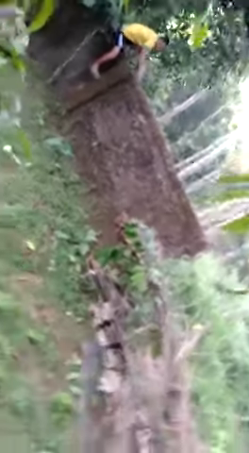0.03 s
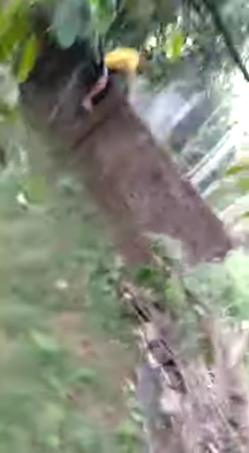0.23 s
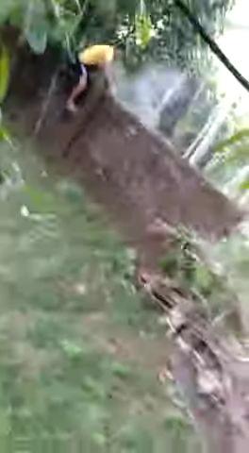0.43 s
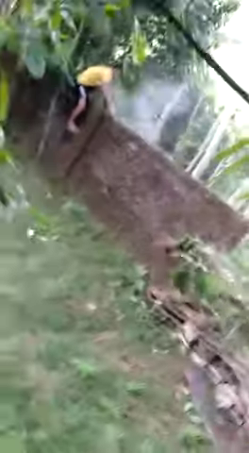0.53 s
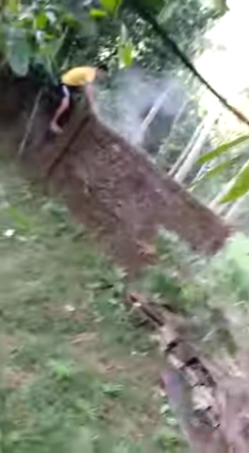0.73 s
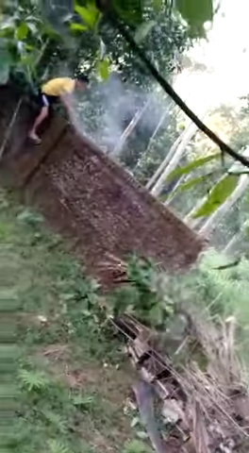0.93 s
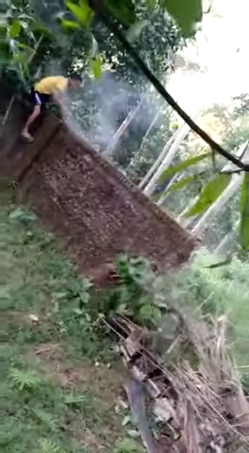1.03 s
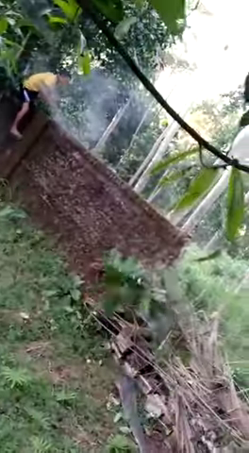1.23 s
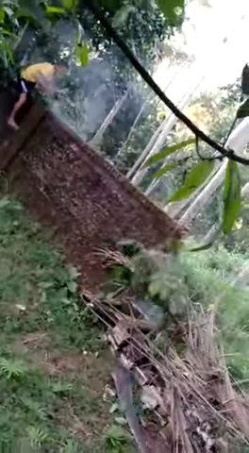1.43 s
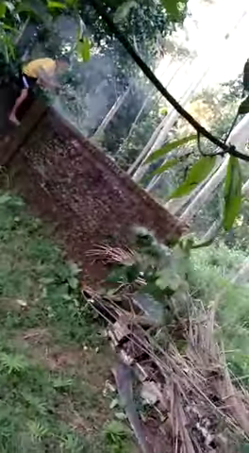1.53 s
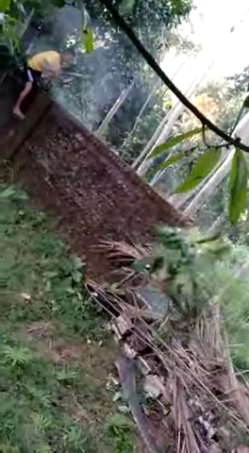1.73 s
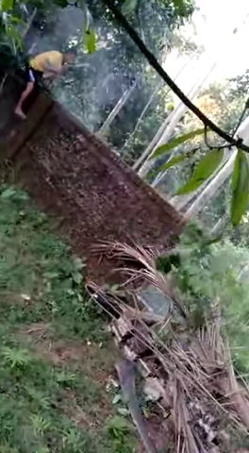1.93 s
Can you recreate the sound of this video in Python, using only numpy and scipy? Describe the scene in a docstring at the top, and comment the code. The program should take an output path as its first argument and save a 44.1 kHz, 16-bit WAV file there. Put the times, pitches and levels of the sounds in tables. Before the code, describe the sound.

A loud, sharp bang goes off on a wooded hillside, just after two soft bumps. Its echo crackles through the trees and rolls away, then leaves rustle faintly near the microphone over quiet insects.

```python
"""On a wooded hillside, a powder charge goes off: two soft bumps, a short spit of ignition, the bang.
Nearby trees scatter the bang, the slope throws it back and the valley rolls on.
Insects sing faintly over a light breeze. Afterwards leaves rustle close to the microphone,
a twig ticks and a faint, far tone slides down."""
import sys
import numpy as np
from scipy import signal
from scipy.fft import rfft, irfft, next_fast_len
from scipy.io import wavfile
from scipy.ndimage import map_coordinates

SR = 44100
rng = np.random.default_rng(int(sys.argv[2]) if len(sys.argv) > 2 else 0)


def wav_out(sig):
    """Save sig, one row per channel (or a flat mono array), as 16-bit PCM at SR to the path in sys.argv[1]."""
    wavfile.write(sys.argv[1], SR, np.round(np.clip(np.atleast_2d(sig).T, -1, 1) * 32767).astype(np.int16))


N = 88200
BANG_S, TOP_HZ = 0.2032, 15780


def amp(db):
    """Turn decibels (dB) into a multiplier."""
    return 10 ** (np.asarray(db) / 20)


def unit(x):
    """Scale a sound to an average (rms) level of 1."""
    return x / np.sqrt(np.mean(x ** 2) + 1e-20)


def along(points, hz):
    """Read between a table's rows, on a log frequency scale."""
    freqs, values = np.transpose(points)
    return np.interp(np.log(hz + 1), np.log(freqs + 1), values)


def since(start):
    """Seconds since the start, zero before it."""
    return np.maximum(np.arange(N) / SR - start, 0)


def wobble(rate):
    """A smooth curve through `rate` random values a second."""
    values = rng.standard_normal(int(N * rate / SR) + 4)
    return map_coordinates(values, [np.arange(N) * rate / SR])


def filtered(x, response):
    """Turn each frequency up or down by response(hz)."""
    size = next_fast_len(N + SR // 2)
    return irfft(rfft(x, size) * response(np.fft.rfftfreq(size, 1 / SR)), size)[:N]


def noise(colour, grain_db=0):
    """Noise with a colour (its balance of low and high); grain_db makes it gritty."""
    white = rng.standard_normal(N) * amp(grain_db * wobble(1500))
    return unit(filtered(white, lambda hz: amp(along(colour, hz))))


def burst(start, rise, fade):
    """A quick swell that dies away. A fade time is the seconds it takes to drop 60 dB."""
    t = since(start)
    return (1 - np.exp(-t / rise)) * amp(-60 * t / fade)


def pulse(colour, size=4096):
    """One push of air with the given colour and a peak of 1."""
    level_db = np.maximum(along(colour, np.fft.rfftfreq(size, 1 / SR)), -60)
    cepstrum = irfft(np.log(amp(level_db)))
    # pack the energy at the start of the pulse
    cepstrum[1:size // 2] *= 2
    cepstrum[size // 2 + 1:] = 0
    push = irfft(np.exp(rfft(cepstrum)))
    return push / np.abs(push).max()


def strikes(rows, shape):
    """Play one short sound at each row's start and level."""
    hits = np.zeros(N)
    for start, db in rows:
        hits[round(start * SR)] += amp(db)
    return signal.fftconvolve(hits, shape)[:N]


def scatter(colour, fades, delay, rise, hold, grain_db=0):
    """Countless small echoes of the bang build up, hold, then each frequency fades at its own speed."""
    hz, t, bands = signal.stft(noise(colour, grain_db), SR, nperseg=256)
    age = np.maximum(t - BANG_S - delay - hold, 0)
    tail = signal.istft(bands * amp(-60 * age / along(fades, hz)[:, None]), SR)[1][:N]
    return tail * (1 - np.exp(-since(BANG_S + delay) / rise))


# The hush of still air. Each row: frequency in Hz, relative level in dB.
AIR_COLOUR = [(25, -2.5), (70, -5), (160, -1.5), (260, -12), (450, -14), (800, -14.5), (1500, -14.5),
              (2200, -20), (3900, -24), (8000, -25), (12000, -30), (15800, -26)]
# The low breeze. Each row: frequency in Hz, relative level in dB.
BREEZE_COLOUR = [(12, -29), (20, 7.5), (27, 0), (60, -19), (150, -4.5), (300, -23), (400, -8.5), (520, -22),
                 (880, -120)]
def air():
    """A breeze slowly rises over still air."""
    swell = 1 - np.exp(-since(0) / 0.76)
    breeze = amp(-63.5 + 0.59 * wobble(6.5)) * noise(BREEZE_COLOUR) * swell
    return breeze + amp(-62) * noise(AIR_COLOUR)


# Insect voices. Each row: pitch in Hz, width in Hz, starting level in dB.
INSECT_BANDS = [(4680, 340, -70), (6210, 190, -71.5), (6830, 190, -63.5), (9520, 590, -73.5)]
def insects(fade_db_per_s=4.5):
    """Insects sing in narrow, pulsing bands of noise that slowly fade."""
    song = np.zeros(N)
    for pitch, width, db in INSECT_BANDS:
        level = amp(db + 1.8 * wobble(45.3))
        band = filtered(rng.standard_normal(N), lambda hz: np.exp(-.5 * ((hz - pitch) / width) ** 2))
        song += level * unit(band)
    return song * amp(-fade_db_per_s * since(0))


def far_tone(start=1.81, length_s=0.13, hz=662, fall_hz_per_s=1040):
    """A faint, far tone swells, slides down and fades."""
    t = np.minimum(since(start), length_s)
    phase = 2 * np.pi * (hz * t - .5 * fall_hz_per_s * t ** 2)
    return amp(-60.5) * np.sin(np.pi * t / length_s) * np.sin(phase)


# Rustling leaves. Each row: frequency in Hz, relative level in dB.
RUSTLE_COLOUR = [(530, -32), (900, -2.5), (1390, -6.5), (1680, -7), (1830, -1.5), (3210, 0), (4760, -8),
                 (5310, -9.5), (6660, -3.5), (7980, -14), (10400, -22), (15800, -8)]
# How the rustle comes and goes. Each row: time in seconds, level in dB.
RUSTLE_SWELL = [(.4, -100), (0.751, -63.5), (.95, -57.5), (1.12, -61), (1.28, -55), (1.42, -54.5),
                (1.52, -57), (1.619, -54.5), (1.77, -54.5), (1.88, -59.5), (2, -57.5)]
# The fine hiss of sliding leaves. Each row: frequency in Hz, relative level in dB.
SWISH_COLOUR = [(2940, -38), (5000, -8), (5150, -13), (6800, 0), (8910, -17), (11600, -14.5), (15800, -3)]
# Leaves brushing past. Each row: start in seconds, level in dB, fade time in seconds.
LEAF_BRUSHES = [(1.27, -58, .25), (1.542, -47, 0.038), (1.573, -45, 0.16), (1.628, -55, 0.054),
                (1.727, -55, .08), (1.925, -54.5, 0.2)]
# The sound of a brush. Each row: frequency in Hz, relative level in dB.
BRUSH_COLOUR = [(350, -46), (600, -24), (778, -5), (1240, -7), (2560, 2), (4910, -18), (6730, -9),
                (8000, -21), (10400, -55), (17600, -120)]
def leaves():
    """Leaves close by rustle, slide and brush past."""
    level_db = np.interp(since(0), *np.transpose(RUSTLE_SWELL)) + 0.65 * wobble(29.9)
    rustle = amp(level_db) * noise(RUSTLE_COLOUR, grain_db=2)
    swish = amp(-52) * noise(SWISH_COLOUR, grain_db=2) * burst(1.13, rise=0.035, fade=1.85)
    brushing = sum(amp(db) * burst(start, 0.0052, fade) for start, db, fade in LEAF_BRUSHES)
    return rustle + swish + noise(BRUSH_COLOUR, grain_db=5) * brushing


# Twig ticks. Each row: start in seconds, level in dB.
TWIG_TICKS = [(1.9122, -44), (1.928, -52), (1.938, -50), (1.966, -55)]
# The twig's ring. Each row: pitch in Hz, relative level in dB, fade time in seconds.
TWIG_NOTES = [(2930, 2.5, 0.042), (2330, -5.5, 0.058), (1850, -17, 0.018), (6750, -15, 0.014)]
# Light taps on wood. Each row: start in seconds, level in dB, pitch in Hz.
WOOD_TAPS = [(.0472, -47.5, 714), (.0757, -49, 617), (1.579, -45, 944), (1.731, -51, 1000)]
def twigs():
    """Small bits of wood tick and tap with a short, slightly rough ring."""
    def ring(hz, fade):
        return np.sin(2 * np.pi * hz * since(0) + .5 * wobble(250)) * burst(0, 0.0013, fade)
    tick = sum(amp(db) * ring(hz, fade) for hz, db, fade in TWIG_NOTES)
    taps = sum(strikes([(start, db)], ring(hz, fade=0.031)) for start, db, hz in WOOD_TAPS)
    return strikes(TWIG_TICKS, tick) + taps


# The hills' deep rumble. Each row: frequency in Hz, relative level in dB.
RUMBLE_COLOUR = [(20, 6), (45, -14), (90, -13), (160, -17), (300, -43)]
# How it dies away. Each row: frequency in Hz, fade time in seconds.
RUMBLE_FADES = [(30, 1.8), (150, 1.4)]
# Booms from the hills. Each row: start in seconds, level in dB.
HILL_BOOMS = [(.312, -38), (0.363, -47), (.745, -50)]
def hills():
    """The hills return the low part of the blast as a rumble and a few booms."""
    rumble = amp(-46.5) * scatter(RUMBLE_COLOUR, RUMBLE_FADES, delay=0.12, rise=0.016, hold=0.18)
    booming = sum(amp(db) * burst(start, rise=0.0034, fade=0.16) for start, db in HILL_BOOMS)
    return rumble + noise(RUMBLE_COLOUR) * booming


# The valley's roll. Each row: frequency in Hz, relative level in dB.
VALLEY_COLOUR = [(59, -54), (100, -38), (267, -6), (497, -8), (786, 2), (942, -9.5), (1110, -6), (1510, -7),
                 (1700, -10), (1970, -5.5), (2170, -12), (3060, -13.5), (5000, -26), (6500, -45),
                 (11000, -120)]
# How it dies away. Each row: frequency in Hz, fade time in seconds.
VALLEY_FADES = [(150, 4.1), (750, 4.15), (1500, 2.7), (4000, 1.33)]
def valley():
    """Late echoes roll on through the valley."""
    return amp(-45.5) * scatter(VALLEY_COLOUR, VALLEY_FADES, delay=0.25, rise=0.028, hold=0.29,
                                grain_db=1.5)


# The slope's answer. Each row: frequency in Hz, relative level in dB.
SLOPE_COLOUR = [(24, -43), (40, -23), (64, -14.5), (198, -38), (230, -19.5), (611, -8.5), (728, -1.5),
                (868, -4.5), (935, -17.5), (1090, -7.5), (1330, -11.5), (1540, -6.5), (1700, -10),
                (2420, -9), (5260, -20.5), (6750, -12), (8450, -28), (12000, -32.5), (15800, -24.5)]
# How it dies away. Each row: frequency in Hz, fade time in seconds.
SLOPE_FADES = [(60, 1.55), (300, 1.36), (750, 1.09), (2000, 1.075), (4500, 0.85), (7000, 0.81),
               (13000, 0.63)]
def slope():
    """The slope throws the bang back as a wash of echoes."""
    return amp(-25.5) * scatter(SLOPE_COLOUR, SLOPE_FADES, delay=0.11, rise=0.025, hold=0.098)


# Crackles off near trees. Each row: start in seconds, level in dB, fade time in seconds.
TREE_CRACKLES = [(0.2482, -19, 0.081), (0.2792, -25, .1), (0.3083, -27.5, 0.14), (.3585, -30, 0.16)]
# The sound of a crackle. Each row: frequency in Hz, relative level in dB.
CRACKLE_COLOUR = [(470, -32), (800, 0), (1610, -3.5), (1890, -3), (2310, 4), (2750, -8), (3120, 0.5),
                  (3710, -12), (4210, -15), (7200, -8), (9010, -48), (15800, -8.5)]
# The blur of echoes among the trees. Each row: frequency in Hz, relative level in dB.
TREE_COLOUR = [(150, -43), (250, -6.5), (360, -7), (392, -17.5), (428, -7.5), (475, -13), (733, -1),
               (887, -14.5), (1060, -5.5), (1320, -9.5), (1550, -3.5), (1810, -14), (2340, -7.5),
               (4530, -16), (5880, -14), (6750, -7), (8610, -21.5), (10100, -22.5), (15800, -18)]
# How it dies away. Each row: frequency in Hz, fade time in seconds.
TREE_FADES = [(60, 0.18), (200, 0.33), (700, 1), (2000, 0.89), (6500, 0.86), (14000, 0.49)]
def trees():
    """Near trees give the shock back as sharp crackles and a blur of echoes."""
    crackling = sum(amp(db) * burst(start, 0.0014, fade) for start, db, fade in TREE_CRACKLES)
    crackles = noise(CRACKLE_COLOUR, grain_db=4) * crackling
    blur = scatter(TREE_COLOUR, TREE_FADES, delay=0.00085, rise=0.0021, hold=0.059, grain_db=0.5)
    return crackles + amp(-24) * blur


# Separate echoes. Each row: start in seconds, peak level in dB.
ECHO_ARRIVALS = [(.2095, -16.5), (.2133, -14), (.2148, -14.5), (.2179, -20), (.2226, -20), (.2385, -23.5),
                 (.249, -16), (.3472, -16.5), (.3592, -17.5), (.3792, -15.5), (.396, -37), (.595, -26),
                 (.975, -45), (1.029, -48), (1.198, -37.5)]
# The sound of one echo. Each row: frequency in Hz, relative level in dB.
ECHO_COLOUR = [(59, -36), (100, -10), (318, -18), (688, 4), (937, -2), (1580, -13.5), (1910, -17),
               (2850, -21), (3540, -12), (4000, -23), (5200, -62), (8800, -120)]
def echoes():
    """The bang bounces off the ground, the trunks and the slope."""
    return strikes(ECHO_ARRIVALS, pulse(ECHO_COLOUR))


# Soft bumps. Each row: start in seconds, peak level in dB, relative bass level in dB.
SOFT_BUMPS = [(0.0469, -40.5, -10), (0.0756, -32, 1)]
def bumps():
    """Two dull pushes on the microphone, the second one heavier."""
    sound = np.zeros(N)
    for start, db, bass_db in SOFT_BUMPS:
        bass = [(30, bass_db - 1), (90, bass_db), (300, bass_db - 12)]
        treble = [(700, -8.5), (1600, -21.5), (3500, -32), (12000, -43)]
        sound -= strikes([(start, db)], pulse(bass + treble))
    return sound


# Spits of ignition. Each row: start in seconds, level in dB, rise and fade times in seconds.
IGNITION_SPITS = [(0.1826, -33.5, 0.0013, 0.045), (0.1926, -36, 0.0023, 0.14), (0.2006, -27, .001, .03)]
# The sound of a spit. Each row: frequency in Hz, relative level in dB.
SPIT_COLOUR = [(120, -40), (200, 5), (508, -27), (879, -8), (1440, -3.5), (3590, -13.5), (4080, -11),
               (4900, -28), (6690, 3), (8180, -19), (15800, -20)]
def ignition():
    """The charge spits just before it fires."""
    spitting = sum(amp(db) * burst(start, rise, fade) for start, db, rise, fade in IGNITION_SPITS)
    return noise(SPIT_COLOUR) * spitting


# The shock's sharp crack. Each row: frequency in Hz, relative level in dB.
CRACK_COLOUR = [(290, -43), (500, -13), (1390, -16), (1780, -11.5), (4120, -9), (4630, -1.5), (5830, -25),
                (6740, 0.5), (7670, -12), (14900, -7.5), (15800, -10)]
# The blast's low push. Each row: frequency in Hz, relative level in dB.
THUMP_COLOUR = [(24, -32), (40, -5), (54, -7.5), (150, -6.5), (194, -7), (269, -11.5), (300, -10.5),
                (390, -44), (660, -120)]
def bang(ring_hz=6655, suction_hz=1.53, thump_hold_s=0.041, thump_fade_s=0.085):
    """The shock cracks, rings the microphone's opening, thumps and leaves low pressure behind."""
    t = since(BANG_S)
    crack = amp(-13.5) * noise(CRACK_COLOUR, grain_db=3) * burst(BANG_S - 0.0012, 0.0011, fade=0.039)
    ring = amp(-12) * np.sin(2 * np.pi * ring_hz * t) * burst(BANG_S, rise=0.00028, fade=0.016)
    thump_db = -36.5 - 60 * since(BANG_S + thump_hold_s) / thump_fade_s
    thump = amp(thump_db) * noise(THUMP_COLOUR) * (1 - np.exp(-t / 0.0018))
    suction = amp(-30.5) * np.cos(2 * np.pi * suction_hz * t) * burst(BANG_S, rise=0.0046, fade=0.99)
    return crack + ring + thump - suction


def scene():
    """Add up every sound at one microphone."""
    blast = bumps() + ignition() + bang()
    hillside = echoes() + trees() + slope() + valley() + hills()
    surroundings = leaves() + twigs() + far_tone() + insects() + air()
    return (blast + hillside + surroundings)[None]


def record(dry):
    """Cut away everything higher than TOP_HZ."""
    return filtered(dry[0], lambda hz: hz < TOP_HZ)[None]


dry = scene()
out = record(dry)
wav_out(out)
```